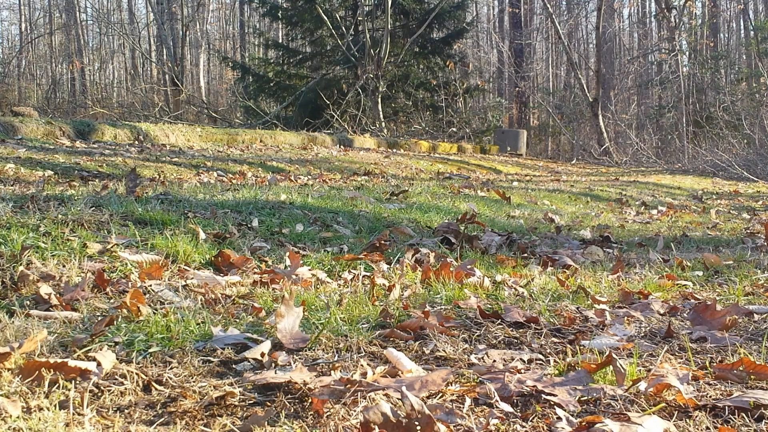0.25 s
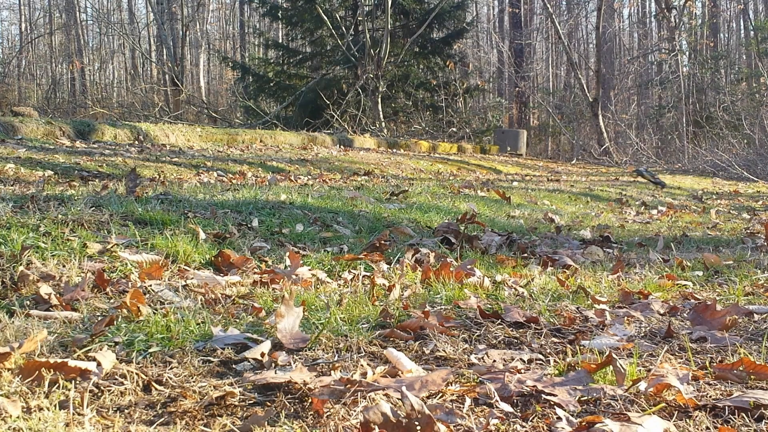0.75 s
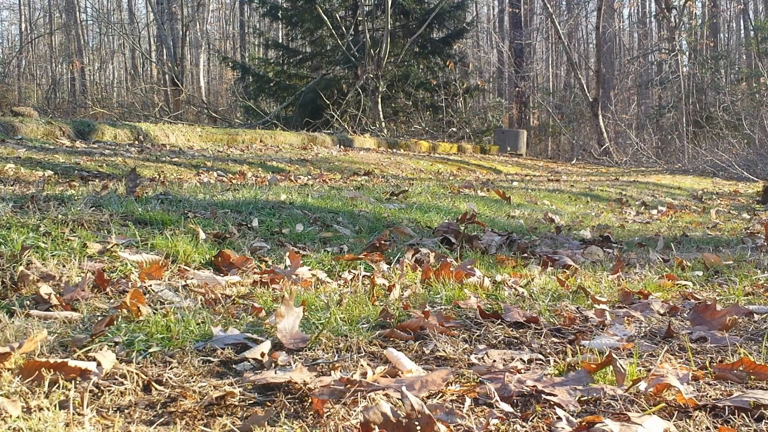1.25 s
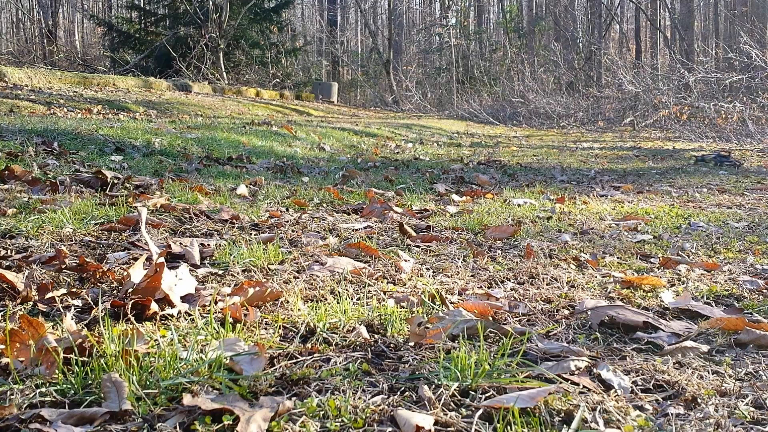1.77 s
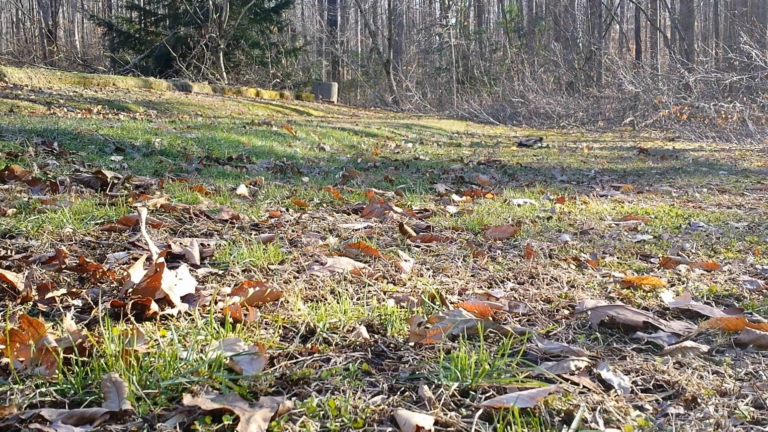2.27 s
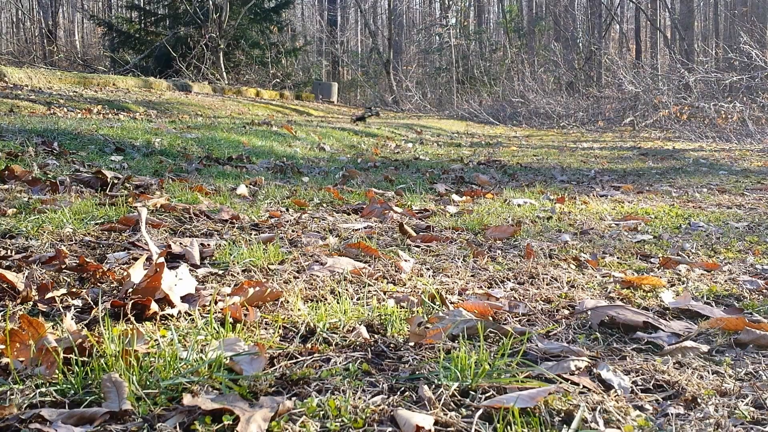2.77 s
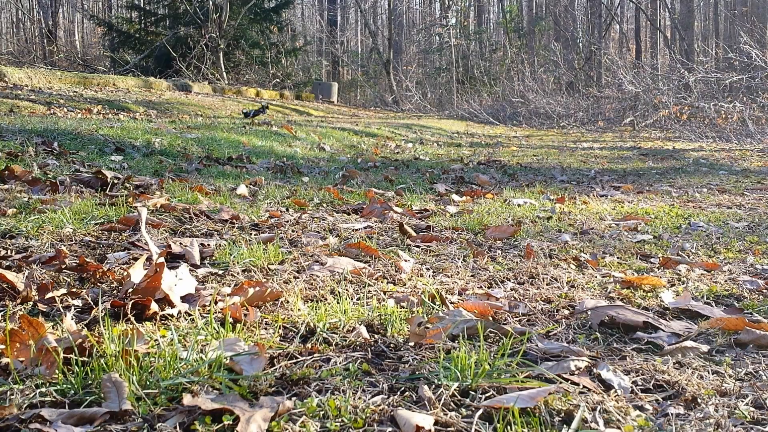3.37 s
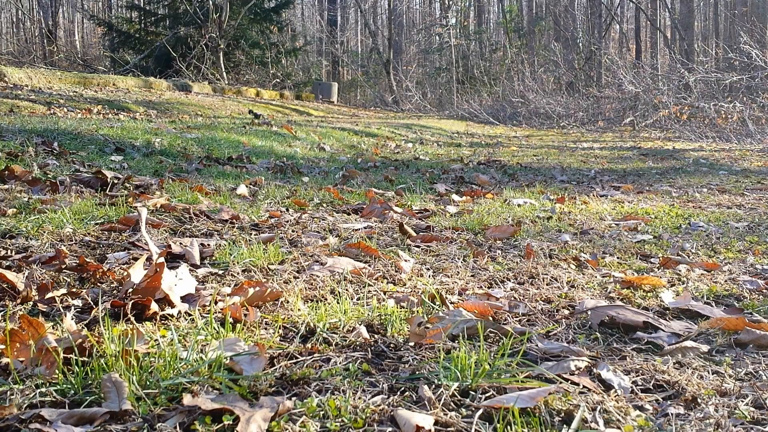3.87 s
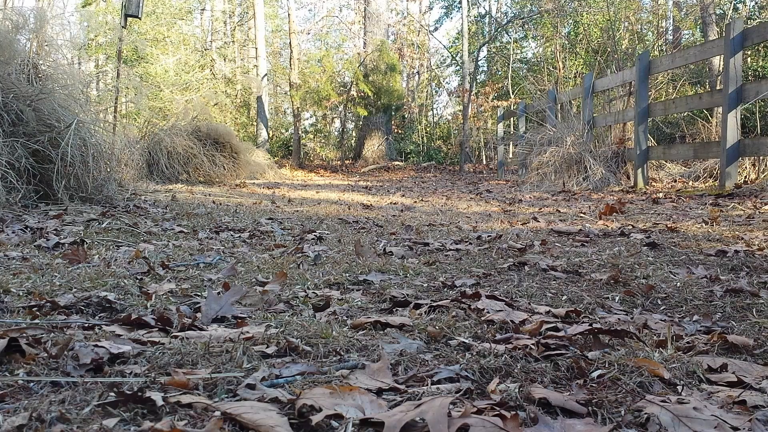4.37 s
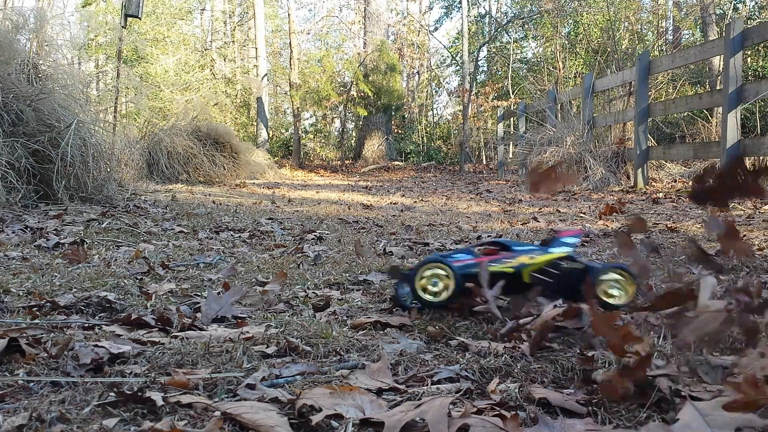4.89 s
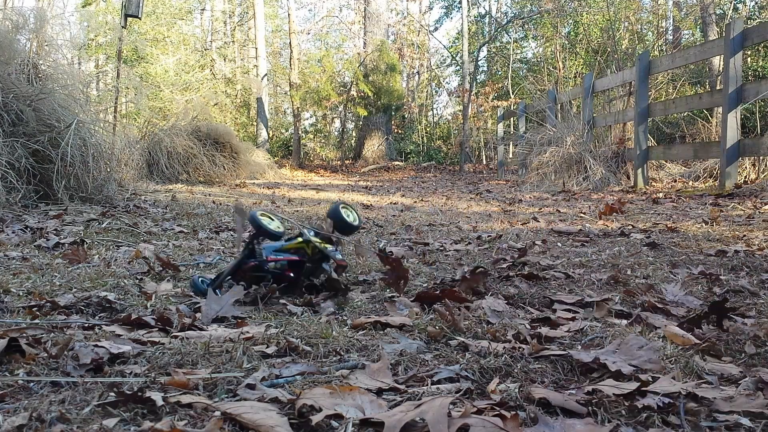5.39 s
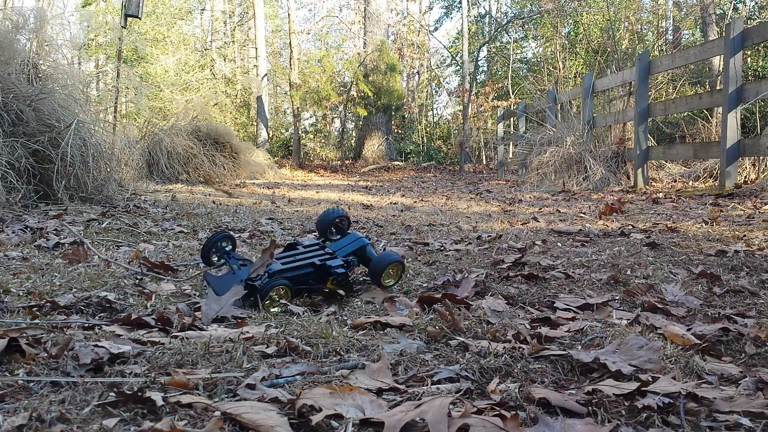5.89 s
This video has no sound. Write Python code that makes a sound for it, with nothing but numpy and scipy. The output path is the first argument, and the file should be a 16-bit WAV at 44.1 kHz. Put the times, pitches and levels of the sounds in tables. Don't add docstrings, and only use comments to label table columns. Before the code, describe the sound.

A small electric buggy crackles faintly through distant dry leaves, then abruptly roars past close by, skids, tumbles with hollow knocks and stirs the litter.

```python
import sys
import numpy as np
from scipy import signal
from scipy.fft import rfft, irfft, next_fast_len
from scipy.io import wavfile
from scipy.ndimage import uniform_filter1d, map_coordinates

SR = 44100
rng = np.random.default_rng(int(sys.argv[2]) if len(sys.argv) > 2 else 0)


def to_wav(sig):
    pcm = np.clip(np.atleast_2d(sig), -1, 1) * 32767
    pcm = np.round(pcm).astype(np.int16)
    wavfile.write(sys.argv[1], SR, pcm.T)


def attenuation_scalar(level_db):
    decades = np.asarray(level_db, float) / 20
    return 10 ** decades


N = 270731

# time in seconds, strength in dB, crackle ridge in Hz,
# dulling of the finest dust by the ground in dB.
CRUSHING = [
    [(0, -38, 6980, -4.5), (.12, -42.5, 7000, -10), (.35, -45, 6800, -11.5), (.58, -45.5, 7000, -8),
     (.68, -47.5, 6400, -4.5), (.83, -45, 6150, -7.5), (1.02, -41, 6140, -17), (1.15, -43, 6320, -9),
     (1.45, -47, 6630, -4), (1.85, -45, 6745, -3.5), (2.28, -51.5, 6870, -1), (2.4, -41, 7060, -6),
     (2.7, -43.5, 6800, -10), (2.78, -48.5, 5900, -9.5), (2.9, -51, 6300, -9), (3.45, -56.5, 6380, -5),
     (4.07, -65, 6110, -9)],
    [(4.08, -23.5, 6200, -8), (4.3, -24.5, 6150, -6), (4.46, -24.5, 5750, -6), (4.57, -22.5, 6400, -9),
     (4.68, -26, 6300, -7.5), (4.8, -32, 6300, -7), (4.86, -34, 6600, -7.5), (4.92, -33, 7000, -13),
     (5.02, -40, 6100, -9.5), (5.175, -37.5, 6400, -9), (5.19, -41.5, 6300, -6), (5.28, -48, 5940, -6),
     (5.4, -48, 6570, -8), (5.54, -44, 6100, -6.5), (5.75, -39.5, 6410, -4), (5.975, -34, 6450, -5.5),
     (6.0, -42, 6370, -2.5), (6.14, -43, 6360, -2.5)],
]
# time in seconds, rumble in dB, limit in Hz above which
# the ground echo cancels it, coarseness of the litter in dB.
TYRE_LOAD = [
    [(0, -45, 1230, -6.5), (.47, -54.5, 1230, 2), (.65, -60, 1230, 6.5), (1.14, -55.5, 1230, -2),
     (1.6, -43.5, 1890, 5), (1.9, -42, 1866, 0.5), (2.2, -48.5, 1870, 4), (2.5, -43, 1380, -6),
     (2.85, -59.5, 1240, 2), (3.12, -52.5, 1240, 2.5), (3.8, -58, 1340, 4.5), (4.07, -67, 1320, 3)],
    [(4.08, -36, 1860, 5.5), (4.5, -37.5, 1610, 3), (4.66, -40.5, 1600, 0), (4.76, -41, 1580, 3),
     (4.92, -49, 1770, 2), (5.05, -53, 1860, 6), (5.2, -50.5, 1800, 0.5), (5.28, -54, 1920, 5.5),
     (5.62, -51.5, 1750, 0.5), (6.0, -45.5, 1840, 5.5)],
]
# time in seconds, lift in dB, fade in ms.
PLOUGHS = [(0.0, 4, 170), (1.196, 6.5, 19), (1.222, 10.5, 7.6), (1.39, 1, 29), (1.54, 2.5, 110),
           (1.89, 4, 22), (1.96, 6.5, 59), (2.14, 1.5, 31), (2.5, 3.5, 140), (3.022, 9, 34), (3.168, 7, 42),
           (3.33, 4, 24), (3.61, 7.5, 160), (3.702, 4, 20), (5.33, 5, 27), (5.425, 8, 20), (5.69, 3, 20),
           (5.8, 0.5, 20)]
# time in seconds, lift in dB, fade in ms.
CLUMPS = [(.18, -8, 6.5), (.27, 2, 9.9), (.39, 3, 28), (.84, 3, 12), (.89, 6, 7.2), (.95, 3, 10),
          (2.668, -3, 7.7), (2.7, -4, 6), (2.757, 8.5, 18), (2.797, 6, 5), (2.828, 5, 6.3),
          (2.884, 13, 9.3), (2.94, 6, 5), (4.112, 2, 12), (4.157, 2, 10), (4.187, 3.5, 21), (4.212, 8.5, 8),
          (4.229, 3, 6), (4.256, -1, 5), (4.271, 3.5, 5), (4.28, -2, 20), (4.302, 4.5, 22),
          (4.331, 6.5, 11), (4.366, -1.5, 5), (4.393, 1, 4), (4.413, 3, 18), (4.457, -1, 6.8),
          (4.48, 0.5, 15), (4.544, -2, 7), (4.557, 6.5, 10), (4.573, 0, 5), (4.6, 1, 8), (4.612, 6, 8),
          (4.643, 1, 7.1), (4.661, 0, 2.1), (4.74, 5, 18), (4.918, 0, 6), (4.885, 1, 8), (4.96, 2, 10),
          (5.11, -1, 9.2), (5.48, 6, 7.2), (5.84, 4, 8), (5.9, -2.5, 15), (6.07, -3, 8), (6.115, 1, 15)]
# frequency in Hz, level in dB per Hz.
LEAF_COLOUR = [(710, -51), (1200, 24), (1490, -0.5), (1940, -3.5), (2100, -8.5), (2890, -7), (4470, -7),
               (6570, -1.5), (7330, -6), (9330, -18.5), (14900, -28.5), (15800, -20), (16500, -96)]
# start and end in seconds, from and to in Hz.
DUST_NOTCHES = [
    (0.264, 0.547, 12100, 8950),
    (0.716, 1.186, 15000, 10000),
    (1.68, 2.047, 8750, 12700),
    (2.337, 2.47, 10640, 10500),
    (2.86, 2.998, 11200, 10020),
]
# start and end in seconds, from and to in Hz.
NEAR_NOTCHES = [
    (4.596, 4.72, 1860, 3100),
]
# time in seconds, peak in dB, pitch in Hz.
FAR_SNAPS = [(0.0165, -21, 6900), (0.18, -24.5, 6800), (0.196, -43, 6800), (0.6519, -25, 6500),
             (0.839, -22, 6100), (1.0271, -21, 6400), (1.0984, -25.5, 6120), (1.1488, -36, 6020),
             (1.1747, -24.5, 6100), (1.196, -20, 6900), (1.402, -27, 7600), (1.507, -34, 6400),
             (1.7112, -23.5, 6740), (1.742, -22.5, 6840), (1.856, -19, 6500), (1.894, -16.5, 6300),
             (1.925, -18, 7560), (1.9503, -22, 6750), (1.9713, -25, 6300), (2.124, -30, 7600),
             (2.502, -32, 6500), (2.5037, -28, 7030), (2.575, -26, 6760), (2.6208, -29, 8230),
             (2.6514, -38, 6950), (2.799, -27, 5700), (2.827, -24, 5760), (2.883, -25.5, 6500),
             (3.1152, -27.5, 5800)]
# time in seconds, peak in dB, pitch in Hz.
NEAR_SNAPS = [(4.159, -6, 6540), (4.3663, -9, 6140), (4.4126, -12, 5950), (4.457, -9, 6160),
              (4.4795, -14, 6630), (4.5438, -4, 6250), (4.6416, -14, 6250), (4.7395, -23, 6800),
              (4.8816, -21, 7140), (4.917, -19.5, 7100), (5.0225, -40, 6260), (5.0545, -21.5, 6100),
              (5.417, -33, 7300), (5.4805, -30, 5460), (5.7998, -27, 6490), (5.84, -23, 6600),
              (6.1187, -23, 6060)]
# time in seconds, peak in dB, pitch in Hz.
STALK_TICKS = [(.1316, -34, 6900), (.652, -32, 7000), (1.021, -32, 6600), (1.217, -23, 7000),
               (1.226, -27, 6900), (1.244, -26, 6000), (1.263, -26, 6850), (1.856, -25, 6800),
               (1.893, -15, 9450), (1.925, -19, 7950), (4.661, -15, 6300), (4.718, -20, 6300),
               (4.8, -22, 6500), (5.297, -29, 6950), (5.4, -37, 8000), (5.589, -33, 7000),
               (5.665, -26, 6800), (5.692, -30, 7200), (5.816, -17, 6600), (5.876, -17, 8600),
               (5.942, -16, 6460), (5.984, -11.5, 6340)]
# frequency in Hz, level in dB per Hz.
RUMBLE_COLOUR = [(88, -60), (150, -6), (323, -8), (412, -5), (519, -5.5), (982, -1), (1240, -5), (1420, -1),
                 (2400, -13.5), (3120, -50), (5280, -120)]
# time in seconds, peak in dB, pitch in Hz, length in ms.
FAR_THUMPS = [(0.081, -36, 700, 9.7), (0.23, -33, 680, 20), (0.388, -35.5, 710, 78),
              (0.495, -35.5, 580, 25), (0.581, -38.5, 764, 62), (0.62, -45, 900, 17), (0.837, -38, 825, 30),
              (1.163, -40.5, 905, 210), (1.211, -26, 835, 14.4), (1.309, -31, 775, 61),
              (1.39, -29, 836, 25), (1.477, -36, 1220, 26), (1.549, -33, 910, 23), (1.653, -43, 905, 15),
              (1.701, -34, 1070, 3.4), (1.732, -29, 950, 30), (1.776, -30.5, 880, 8.6),
              (1.877, -26, 820, 31), (1.925, -31, 960, 410), (1.968, -30, 580, 18), (2.139, -28, 865, 30),
              (2.317, -32, 650, 26), (2.576, -37.5, 860, 80), (2.628, -36, 620, 12),
              (3.025, -36.5, 850, 18), (3.117, -30.5, 740, 20), (3.163, -27, 736, 19.4),
              (3.309, -37.5, 850, 41), (3.569, -40.5, 790, 18), (3.61, -33.5, 816, 57)]
# time in seconds, peak in dB, pitch in Hz, length in ms.
NEAR_THUMPS = [(4.092, -23, 783, 48), (4.191, -20.5, 750, 25), (4.299, -29.5, 356, 50),
               (4.348, -26.5, 550, 10), (4.423, -31, 506, 11), (4.499, -24.5, 750, 16),
               (4.529, -54, 1075, 16), (4.647, -25.5, 705, 13), (4.719, -29, 684, 42),
               (5.483, -37, 780, 28), (5.753, -54, 955, 22.7), (5.868, -41, 764, 12.3),
               (5.925, -34, 1320, 30), (6.052, -46, 1382, 8.2)]
# time in seconds, peak in dB, pitch in Hz, length in ms.
SHELL_KNOCKS = [
    (4.885, -36, 375, 6),
    (4.905, -29.5, 1380, 23),
    (5.132, -31.5, 950, 18),
    (5.302, -31.5, 820, 5.5),
    (5.328, -22.5, 1090, 14),
    (5.336, -34, 560, 12),
    (5.338, -32.5, 2170, 7.9),
]
# time in seconds, slips per second, level in dB.
SKID = [
    (4.715, 335, -67),
    (4.742, 308, -37),
    (4.761, 338, -34),
    (4.797, 460, -38),
    (4.835, 332, -43.5),
    (4.876, 320, -47),
    (4.894, 520, -41.5),
    (4.911, 720, -57),
    (4.926, 760, -63),
]
# frequency in Hz, level in dB.
SKID_BODY = [(200, -22), (420, -2.5), (680, 2), (1000, -5.5), (1400, -13), (2200, -36)]
# time in seconds, mesh in Hz, level in dB.
WHINE = [
    (0.8, 8950, -50),
    (0.898, 8770, -55.5),
    (0.98, 9070, -51),
    (1.05, 9280, -59),
    (1.12, 9400, -55),
    (1.17, 8940, -51),
]
# time in seconds, from and to in Hz, length in ms, level in dB.
SQUEALS = [(.075, 9000, 7300, 18, -40.5), (1.755, 9200, 7600, 18, -41), (2.44, 9000, 7400, 16, -43),
           (4.124, 3990, 3970, 16, -40), (0.233, 9200, 6750, 17, -41), (1.392, 9900, 7650, 19, -40),
           (1.537, 10100, 8700, 31, -38.5), (1.994, 9400, 8600, 4.2, -40), (2.13, 10600, 10600, 11, -50),
           (2.147, 9700, 7300, 25, -33.5), (2.505, 9270, 6940, 16, -35), (2.618, 9380, 7170, 11, -33),
           (2.649, 7020, 6830, 9.6, -32), (3.618, 10800, 10700, 9.9, -53), (3.628, 9300, 6360, 30, -41),
           (5.415, 8000, 7640, 10, -31)]
# time in seconds, lead of the left microphone in ms, left over right in dB.
BEARING = [(0, -0.032, 0), (.5, 0.074, 0.5), (1.0, 0.1, 2), (1.55, 0.17, 1), (2.0, 0.1, 1.5),
           (2.6, 0.017, 0), (3.2, -0.087, 0.5), (4.066, -0.059, 0), (4.074, 0.3, 3), (4.45, 0.408, 4.5),
           (4.75, 0.11, 2), (4.95, 0.036, 1.5), (5.4, -0.056, 1), (6.14, -0.029, 1.5)]
# frequency in Hz, level in dB per Hz.
TRAFFIC_COLOUR = [(12, -40), (20, -18), (44, -5), (129, 5), (185, -4.5), (266, -4), (342, -6), (1040, -17),
                  (1410, -24), (2210, -18), (6360, -20), (8170, -27), (15500, -23)]
# time in seconds, level of the hum in dB.
HUM_DUCK = [
    (3.7, -7.5),
    (4.07, -11),
    (4.1, -7),
    (4.68, -10),
    (5.09, -26),
    (6.14, -6),
]
# frequency in Hz, difference in dB.
PORTS = [(100, 0.5), (2400, 1), (4400, 1), (6500, 2), (9000, -3), (15000, 0)]

CRACKLE_HZ = 6500
PLOUGH_RISE_MS, CLUMP_RISE_MS = 16, 2.4
LARGE_LIFT, DUST_LIFT, CLUMP_DUST = 0.99, 1.39, 0.68
LARGE_BY_CRUSH, LARGE_BY_LOAD, LARGE_DB = 0.73, 0.41, -1
NOTCH_DEPTH = 0.97
PINION_TEETH = 19
SCATTER_DB, SCATTER_ABOVE_HZ = -3.5, 1730
HUM_DB, AIR_DB = -46.5, -60
CHANGE_S, CHANGE_FADE_S, CHANGE_JUMP = 4.0725, 0.016, 0.83


def leaves():
    crush_db, ridge_hz, dulling_db = by_shot(CRUSHING)
    load_db, _, coarse_db = by_shot(TYRE_LOAD)
    plough_db = plunges(PLOUGHS, PLOUGH_RISE_MS)
    clump_db = plunges(CLUMPS, CLUMP_RISE_MS)
    lift_db = plough_db + clump_db
    large_db = LARGE_BY_CRUSH * crush_db + LARGE_BY_LOAD * load_db + LARGE_LIFT * lift_db
    large_db = large_db + coarse_db + LARGE_DB + 0.5
    crackle_db = crush_db + lift_db - 0.5
    dust_db = crush_db + dulling_db + DUST_LIFT * plough_db + CLUMP_DUST * clump_db + 0.4

    lumps = crunches(per_s=90, fade_ms=4, depth=0.35)
    fractures = (grains(5500, 2.3) + 0.5 * rng.standard_normal((2, N))) * lumps
    large = attenuation_scalar(1.6 * drift(30)) * coloured(fractures, LEAF_COLOUR, 2150, 4700)
    dust = attenuation_scalar(1.6 * drift(30)) * coloured(fractures, LEAF_COLOUR, 8600, 20000)
    small = fractures[::-1]
    ridge = 0.85 * coloured(small, LEAF_COLOUR, 6850, 7900)
    crackle = rms_one(coloured(small, LEAF_COLOUR, 3950, 7800) + ridge)
    slide = np.exp(2j * np.pi * np.cumsum(ridge_hz - CRACKLE_HZ) / SR)
    analytic = signal.hilbert(crackle, next_fast_len(N))[:, :N]
    crackle = attenuation_scalar(1.3 * drift(35)) * np.real(analytic * slide)

    large = attenuation_scalar(large_db) * ground_echo(large, NEAR_NOTCHES)
    dust = attenuation_scalar(dust_db) * ground_echo(dust, DUST_NOTCHES)
    return large + attenuation_scalar(crackle_db) * crackle + dust


def twigs():
    breaks = FAR_SNAPS + NEAR_SNAPS
    count = len(breaks)
    ticks = hits(breaks, np.full(count, 0.6), width=0.97, rise_ms=0.05, offset_db=-12.5, body=0)
    rings = hits(breaks, np.full(count, 3.3), width=0.28, rise_ms=0.062, offset_db=-2, body=0)
    stalk_ms = np.full(len(STALK_TICKS), 0.8)
    stalks = hits(STALK_TICKS, stalk_ms, width=0.43, rise_ms=0.05, offset_db=-3.5, body=0)
    return ticks + rings + stalks


def tyres():
    rumble_db, top_hz, _ = by_shot(TYRE_LOAD)
    drumming = grains(900, 2.5) + 0.8 * rng.standard_normal((2, N))
    drumming = drumming * crunches(per_s=60, fade_ms=12, depth=0.6)
    bright = np.clip((top_hz - 1250) / 550, 0, 1)
    dull = coloured(drumming, RUMBLE_COLOUR, 180, 1250)
    full = coloured(drumming, RUMBLE_COLOUR, 180, 1850)
    return attenuation_scalar(rumble_db - 0.5) * ((1 - bright) * dull + bright * full)


def chassis_thumps():
    thumps = FAR_THUMPS + NEAR_THUMPS
    return hits(thumps, np.array(thumps)[:, 3], width=0.96, rise_ms=0.27, offset_db=0, body=1)


def shell_knocks():
    lengths_ms = np.array(SHELL_KNOCKS)[:, 3]
    return hits(SHELL_KNOCKS, lengths_ms, width=0.6, rise_ms=1.9, offset_db=-3.5, body=1)


def skid():
    per_s, db = in_time(with_ends(SKID, 0.01, 0.011, -90))
    per_s = uniform_filter1d(per_s, size=300) * (1 + 0.04 * drift(90))
    turns = 2 * np.pi * np.cumsum(per_s) / SR
    hz, body_db = np.transpose(SKID_BODY)
    stack = np.zeros(N)
    for k in range(1, 6):
        stack += attenuation_scalar(np.interp(k * per_s, hz, body_db)) * np.sin(k * turns)
    return attenuation_scalar(db + 4.5 + 1.6 * drift(75)) * stack


def motor():
    mesh_hz, db = in_time(with_ends(WHINE, 0.1, 0.047, -80))
    turns = 2 * np.pi * np.cumsum(mesh_hz * (1 + 0.0084 * drift(187))) / SR / PINION_TEETH
    whine = np.zeros(N)
    for k, lift_db in enumerate([3, 4, 3, 0, -2, -4, -6, -8, -2, -9]):
        flutter = attenuation_scalar(lift_db + 3.5 * drift(25))
        whine += flutter * np.sin((PINION_TEETH - 8 + k) * turns + k * k)
    return attenuation_scalar(db) * whine


def squeals():
    out, flutter = np.zeros(N), 1 + 1.56 * drift(500)
    for s, from_hz, to_hz, ms, db in SQUEALS:
        along = np.linspace(0, 1, int(ms * SR / 1000))
        hz = to_hz + (from_hz - to_hz) * (1 - along) ** 1.7
        tone = np.sin(2 * np.pi * np.cumsum(hz) / SR)
        at = round(s * SR)
        out[at:at + len(along)] += attenuation_scalar(db) * np.sin(np.pi * along) ** 0.22 * tone
    return out * flutter


def traffic():
    mid, side = rng.standard_normal((2, N))
    hum = coloured(mid + 0.22 * side * [[1], [-1]], TRAFFIC_COLOUR, 10, 306)
    air = coloured(rng.standard_normal((2, N)), TRAFFIC_COLOUR, 390)
    hum_db = HUM_DB + in_time(HUM_DUCK)[0] + 1.2 * drift(6)
    lean = attenuation_scalar(np.array([[0.9], [-0.9]]))
    return attenuation_scalar(hum_db) * hum * lean + attenuation_scalar(AIR_DB) * air


def placed(common, scattered):
    lead_ms, pan_db = in_time(BEARING)
    high = signal.butter(1, SCATTER_ABOVE_HZ, "high", fs=SR, output="sos")
    side = attenuation_scalar(SCATTER_DB) * signal.sosfilt(high, scattered)
    heard_at = np.arange(N) - lead_ms * SR / 1000
    right = map_coordinates(common - side, [heard_at], order=5, mode="nearest")
    return np.array([(common + side) * attenuation_scalar(pan_db / 2), right * attenuation_scalar(-pan_db / 2)])


def ground_echo(x, notches):
    t, depth, hz = np.arange(N) / SR, np.zeros(N), np.full(N, 11000.0)
    for start, end, from_hz, to_hz in notches:
        on = (t > start) & (t < end)
        along = (t[on] - start) / (end - start)
        depth[on] = NOTCH_DEPTH * np.sin(np.pi * along) ** 1.1
        hz[on] = from_hz + (to_hz - from_hz) * along
    late = np.arange(N) - SR / hz
    echo = np.array([map_coordinates(c, [late], order=3, mode="nearest") for c in x])
    return x - depth * echo


def plunges(table, rise_ms):
    out, t = np.zeros(N), np.arange(N) / SR
    for s, db, ms in table:
        near = slice(max(int(s * SR) - 2000, 0), int(s * SR) + SR)
        ago_ms = 1000 * (t[near] - s)
        rise = np.clip(1 + ago_ms / rise_ms, 0, 1)
        out[near] += db * rise * np.exp(-np.maximum(ago_ms, 0) / ms)
    return out


def crunches(per_s, fade_ms, depth):
    starts = rng.random(N) * (rng.random(N) < per_s / SR)
    return 1 + depth * signal.lfilter([1], [1, -np.exp(-1000 / (fade_ms * SR))], starts)


def grains(per_s, spread_db):
    sizes = attenuation_scalar(spread_db * np.minimum(rng.exponential(1, (2, N)), 4))
    sizes = sizes * rng.choice([-1, 1], (2, N))
    return rms_one(sizes * (rng.random((2, N)) < per_s / SR))


def burst(hz, ms, width, rise_ms, noise, body):
    t = np.arange(noise.shape[1]) / SR
    shape = (1 - np.exp(-1000 * t / rise_ms)) * np.exp(-1000 * t / max(ms, 0.5))
    r, w = np.exp(-np.pi * width * hz / SR), 2 * np.pi * hz / SR
    ring = [1, -2 * r * np.cos(w), r * r]
    once = signal.lfilter([1, -1], ring, noise * shape)
    twice = signal.lfilter([1, body - 1], ring, once)
    return twice / np.max(np.abs(twice[0]))


def hits(table, lengths_ms, width, rise_ms, offset_db, body):
    out, noise = np.zeros((2, N + 4096)), rng.standard_normal((len(table), 2, 4096))
    for (s, db, hz, *_), ms, draw in zip(table, lengths_ms, noise):
        at = round(s * SR)
        out[:, at:at + 4096] += attenuation_scalar(db + offset_db) * burst(hz, ms, width, rise_ms, draw, body)
    return out[:, :N]


def coloured(x, points, low_hz=10, high_hz=20000):
    size = next_fast_len(N)
    hz = np.arange(1, size // 2 + 2) * SR / size
    points_hz, points_db = np.transpose(points)
    db = np.interp(np.log(hz), np.log(points_hz), points_db)
    edges = 1 / np.sqrt((1 + (low_hz / hz) ** 14) * (1 + (hz / high_hz) ** 14))
    return rms_one(irfft(rfft(x, size) * attenuation_scalar(db) * edges, size)[..., :N])


def drift(rate):
    r = np.exp(-40 * np.pi * rate / SR)
    slow = signal.lfilter([1], [1, -2 * r, r * r], rng.standard_normal(N // 20 + 2002))[2000:]
    return np.interp(np.arange(N) / 20, np.arange(len(slow)), rms_one(slow))


def rms_one(x):
    return x / np.sqrt(np.mean(x ** 2) + 1e-20)


def in_time(rows):
    s, *columns = np.transpose(rows)
    return [np.interp(np.arange(N) / SR, s, c) for c in columns]


def with_ends(rows, before_s, after_s, db):
    first = (rows[0][0] - before_s, rows[0][1], db)
    last = (rows[-1][0] + after_s, rows[-1][1], db)
    return [first] + rows + [last]


def by_shot(tables):
    since = np.arange(N) / SR - CHANGE_S
    near = (since > 0) * np.minimum(CHANGE_JUMP + (1 - CHANGE_JUMP) * since / CHANGE_FADE_S, 1)
    pairs = zip(in_time(tables[0]), in_time(tables[1]))
    return [(1 - near) * far + near * close for far, close in pairs]


def scene():
    common, scattered = leaves() + twigs() + tyres() + chassis_thumps() + shell_knocks()
    return placed(common + skid() + motor() + squeals(), scattered) + traffic()


def band_limit(x):
    return signal.sosfilt(signal.butter(12, 16680, fs=SR, output="sos"), x)


def record(dry):
    size, (hz, db) = next_fast_len(N), np.transpose(PORTS)
    bins_hz = np.arange(1, size // 2 + 2) * SR / size
    tilt_db = np.interp(np.log(bins_hz), np.log(hz), db)
    heard = irfft(rfft(dry, size) * attenuation_scalar(tilt_db / 2 * [[1], [-1]]), size)[:, :N]
    rounded = 0.7 * np.tanh(heard / 0.7)
    mix = signal.sosfilt(signal.cheby2(14, 50, 15900, fs=SR, output="sos"), rounded)
    return band_limit(mix)


dry = scene()
out = record(dry)
to_wav(out)
```